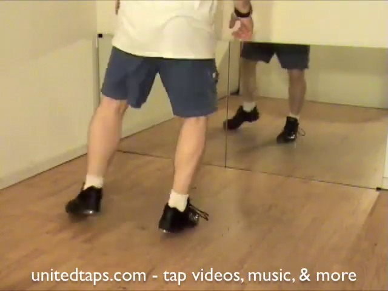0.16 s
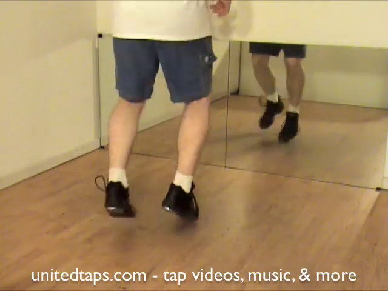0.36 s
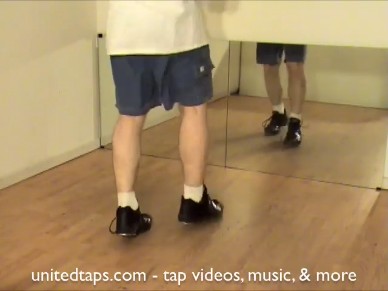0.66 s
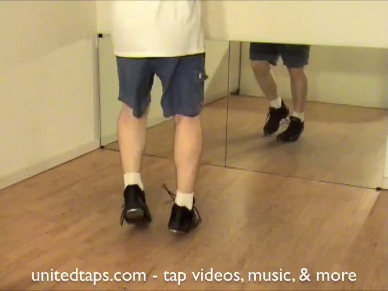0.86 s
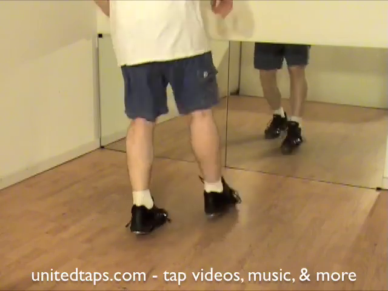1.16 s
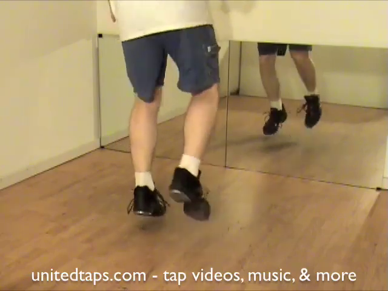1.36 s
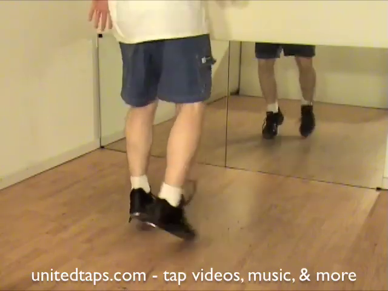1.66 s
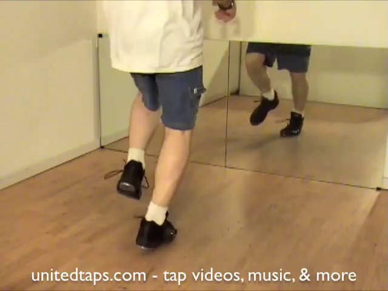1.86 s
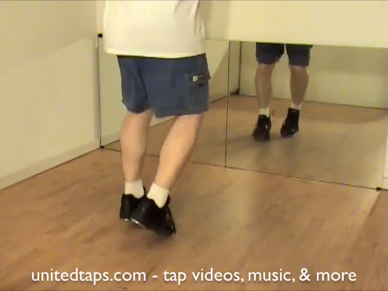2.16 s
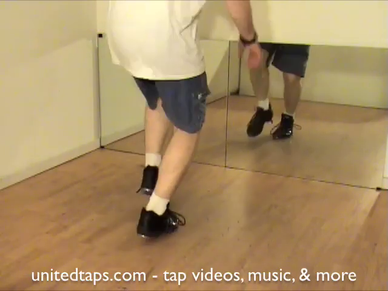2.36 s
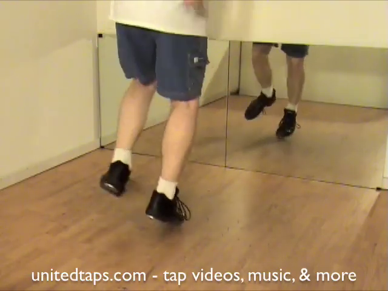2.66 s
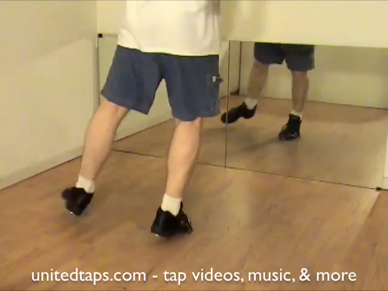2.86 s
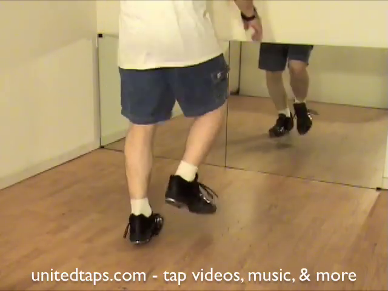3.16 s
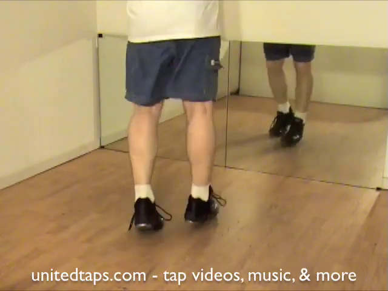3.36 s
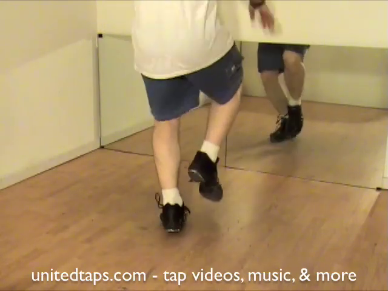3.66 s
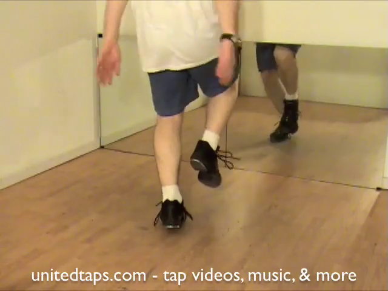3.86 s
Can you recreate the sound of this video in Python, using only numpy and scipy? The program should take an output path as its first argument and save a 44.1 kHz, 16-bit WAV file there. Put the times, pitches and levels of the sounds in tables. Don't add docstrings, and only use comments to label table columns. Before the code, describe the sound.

A solo tap dancer's metal-plated shoes click and knock on floorboards, starting in the ring of an earlier step, with some heavier low thumps; lively room echo, distant microphone, faint background hiss.

```python
import sys
import numpy as np
from scipy import signal
from scipy.fft import rfft, irfft
from scipy.io import wavfile

SR = 44100
rng = np.random.default_rng(int(sys.argv[2]) if len(sys.argv) > 2 else 0)


def natural_amplitude(level_db):
    exponent = np.asarray(level_db, float) / 20
    return 10 ** exponent


def log_audio(samples):
    frames = np.atleast_2d(samples).T
    limited = np.clip(frames, -1, 1)
    pcm = np.round(limited * 32767).astype(np.int16)
    wavfile.write(sys.argv[1], SR, pcm)


N = 176400

# [t/s, click level/dB, boards level/dB, plate level/dB, edge level/dB]
HEEL_DROPS = [(0.181, -3, -14, -23.5, -17), (0.3184, -4.5, -14, -27, -15), (0.437, -6.5, -14.5, -31, -15.5),
              (0.9808, -6, -17, -30, -16.5), (1.4143, -5.5, -17, -28.5, -16.5),
              (1.9652, -6, -16, -25.5, -19), (2.1036, 0, -16, -21, -11), (2.4274, -5, -17.5, -30, -16.5),
              (2.5705, -6, -17.5, -29.5, -16), (2.8359, -7.5, -14.5, -30, -18),
              (2.9529, -6.5, -20, -25.5, -20.5), (3.0699, -8.5, -16, -29.5, -17.5),
              (3.586, -2, -18, -27, -15)]
# [click f/Hz, boards f/Hz]
HEEL_PITCHES = [(4370, 665), (4240, 726), (3990, 600), (4270, 606), (4500, 580), (3950, 582), (4070, 642),
                (3870, 570), (3900, 584), (4170, 687), (4360, 713), (4160, 602), (4780, 640)]
# [t/s, click, boards, plate, edge level/dB]
LIGHT_TOUCHES = [
    (-.04, -2.5, -16.5, -30, -16.5),
    (.098, -8, -24, -51, -15),
    (0.784, -44, -21, -81, -21),
]
# [click f/Hz, boards f/Hz]
TOUCH_PITCHES = [(4000, 527), (4500, 720), (4500, 880)]
# [multiple of click f, length t/s, own level/dB, extra level into the room/dB]
HEEL_CLICK_MODES = [(0.819, 0.00069, -4, 0.5), (1.099, 0.0011, -1.5, -8.5)]
HEEL_EDGE_MODES = [(1.45, 0.00049, 5, 1.3), (1.9, 0.00025, 1, 3.5)]
# [first gap f/Hz, rebound level/dB]
HEEL_BOUNCE = (2263, -20.5)


def heel_drops(mix):
    plate_hz = 1500
    rows = list(HEEL_DROPS) + list(LIGHT_TOUCHES)
    pitches = list(HEEL_PITCHES) + list(TOUCH_PITCHES)
    for row, hz in zip(rows, pitches):
        sound = strike(row, (*hz, plate_hz), HEEL_CLICK_MODES, HEEL_EDGE_MODES, HEEL_BOUNCE)
        add(mix, row[0], sound)


# [t/s, click level/dB, boards level/dB, plate level/dB, edge level/dB]
TOE_TAPS = [(0.0833, 0, -26, -19, -21.5), (0.6464, -4.5, -26, -29.5, -11.5),
            (0.7864, -3, -42, -32.5, -17.5), (1.1184, -8.5, -25, -25, -21), (1.272, -3.5, -25.5, -25, -11),
            (1.527, -2.5, -20.5, -23, -12), (1.6574, 0, -30, -24, -10), (1.7708, 0, -21.5, -20, -13.5),
            (2.2799, 0, -32.5, -20.5, -14), (2.7282, -2, -25.5, -22, -17), (3.2622, -2.5, -32.5, -26, -18),
            (3.4068, -2.5, -21.5, -24, -12)]
# [click f/Hz, boards f/Hz, plate f/Hz]
TOE_PITCHES = [(4470, 580, 1710), (3980, 495, 1470), (4250, 560, 2130), (3960, 590, 1660),
               (3750, 550, 1620), (3750, 617, 1870), (3550, 540, 1580), (4230, 633, 1750),
               (3860, 390, 1710), (4570, 630, 1620), (4000, 540, 1450), (4570, 670, 1900)]
# [first gap f/Hz, rebound level/dB]
TOE_BOUNCES = [(2900, -10), (2600, -4), (2600, -4.5), (2500, -8), (2450, -6), (2650, -7), (2600, -7),
               (2700, -9), (2700, -8), (2900, -8), (2400, -9), (1350, -12)]
# [multiple of click f, length t/s, own level/dB, extra level into the room/dB]
TOE_CLICK_MODES = [(0.798, 0.00092, -8, -1), (1.032, 0.00091, -5, -4)]
TOE_EDGE_MODES = [(1.499, 0.00074, 1.5, 2), (1.95, 0.0003, -1, 3.8)]


def toe_taps(mix):
    for row, hz, rebound in zip(TOE_TAPS, TOE_PITCHES, TOE_BOUNCES):
        add(mix, row[0], strike(row, hz, TOE_CLICK_MODES, TOE_EDGE_MODES, rebound))


# [multiple of boards f, length t/s, own level/dB, extra level into the room/dB]
BOARD_MODES = [(.88, 0.0059, 0.28, 6.9), (1.399, 0.00361, -0.64, 6.4)]
PLATE_MODES = [(.86, 0.00357, 3.35, 2.24), (1.14, 0.0018, 6.5, 4.9)]


def strike(row, pitches, click, edge, rebound):
    pitch_spread = 0.025
    direct_ring, direct_db = 1.305, 4
    gap_hz, rebound_db = rebound
    hz_axis = np.fft.rfftfreq(1024, 1 / SR)
    comb = 1 - natural_amplitude(rebound_db) * np.exp(-2j * np.pi * hz_axis / gap_hz)
    direct, into_room = np.zeros(1024), np.zeros(1024)
    groups = (click, BOARD_MODES, PLATE_MODES, edge)
    for db, modes, unit in zip(row[1:], groups, (*pitches, pitches[0])):
        gaps = 1 if modes is BOARD_MODES else comb
        for pitch, length, own_db, room_db in modes:
            hz = pitch * unit * (1 + pitch_spread * rng.standard_normal())
            head_on = natural_amplitude(DIRECT := direct_db) * burst(hz, direct_ring * length, 2 * np.pi * rng.random())
            spread = natural_amplitude(room_db) * burst(hz, length)
            head_on, spread = natural_amplitude(db + own_db) * irfft(rfft([head_on, spread]) * gaps)
            direct = direct + head_on
            into_room = into_room + spread
    out = signal.fftconvolve(direct, reflections()) + signal.fftconvolve(into_room, room_tail())
    add(out, 0, direct)
    return out


def burst(hz, length, phase=0):
    peak_s = 0.0011
    t = np.arange(1024) / SR - max(peak_s, length / 3)
    u = np.maximum(t / length * 6 + 2, 0)
    envelope = (u / 2) ** 2 * np.exp(2 - u)
    return -envelope * np.cos(2 * np.pi * hz * t + phase)


# [t/s, level/dB]
JOIST_LANDINGS = [(0.32, -31.5), (0.648, -25), (0.79, -32), (0.983, -37), (1.274, -29), (1.528, -29),
                  (1.655, -25), (2.103, -21.5), (2.431, -34), (2.573, -39), (2.835, -41), (3.409, -26),
                  (3.585, -20)]


def landings(mix):
    joist_hz, length_s = 130, 0.0056
    for s, db in JOIST_LANDINGS:
        add(mix, s, natural_amplitude(db + 8.5) * burst(joist_hz, length_s, np.pi / 2))


# [delay t/s, level/dB]
REFLECTIONS = [(.004, -2.5), (.0074, -7), (.0105, -12), (.0140, -11), (.018, -14)]


def reflections():
    shift_s, shift_db = 0.0003, 1.5
    walls = np.zeros(SR)
    for delay, db in REFLECTIONS:
        shift, size = rng.standard_normal(2)
        walls[round((delay + shift_s * shift) * SR)] = natural_amplitude(db + shift_db * size)
    return walls


# [f/Hz, t60/s]
DECAY_TIMES = [(120, .3), (330, .72), (870, .72), (2300, .62), (4500, .64), (7000, .56), (10000, .4)]
# [f/Hz, t/s]
BUILD_UP = [(300, 0.0047), (1500, 0.0046), (5000, 0.0013)]
# [f/Hz, t60/s, level/dB]
STANDING_WAVES = [(331.8, 0.69, -35), (441.6, 0.85, -38), (511.6, 0.3, -41.5)]


def room_tail():
    level_db = 7.5
    taps = np.zeros(SR)
    taps[np.arange(0, SR - 10, 10) + rng.integers(0, 10, (SR - 1) // 10)] = 1
    taps = taps * rng.choice([-1., 1.], SR)
    hz, t, z = signal.stft(taps, SR, nperseg=128, noverlap=96)
    decay = natural_amplitude(-60 * t / read(DECAY_TIMES, hz)[:, None])
    rise = 1 - np.exp(-t / read(BUILD_UP, hz)[:, None])
    out = signal.istft(z * decay * rise, SR, nperseg=128, noverlap=96)[1][:SR]
    t = np.arange(SR) / SR
    for f, t60, db in STANDING_WAVES:
        out = out + natural_amplitude(db - 60 * t / t60) * np.sin(2 * np.pi * f * t) * rng.choice([-1., 1.])
    return natural_amplitude(level_db) * out / np.linalg.norm(out)


# [f/Hz, level/dB]
HUSH_SPECTRUM = [(20, 0), (60, -3), (150, -9), (300, -20), (1000, -20), (4000, -27), (8000, -44),
                 (10500, -70)]


def hush():
    level_db = -64
    shape = natural_amplitude(read(HUSH_SPECTRUM, np.fft.rfftfreq(N, 1 / SR)))
    x = irfft(rfft(rng.standard_normal(N)) * shape, N)
    return natural_amplitude(level_db) * x / x.std()


def hum():
    hum_hz, level_db = 229, -68
    return natural_amplitude(level_db) * np.sin(2 * np.pi * hum_hz * np.arange(N) / SR)


def read(points, hz):
    f, value = np.transpose(points)
    return np.interp(np.log(hz + 1), np.log(f + 1), value)


def add(mix, s, sound):
    at = round(s * SR)
    sound = sound[max(-at, 0):]
    part = mix[max(at, 0):][:len(sound)]
    part += sound[:len(part)]


def scene():
    mix = np.zeros(N)
    heel_drops(mix)
    toe_taps(mix)
    landings(mix)
    return mix[None]


# [f/Hz, level/dB]
MIC_RESPONSE = [(150, -13.5), (280, -6.5), (2000, -6), (2500, -3), (3200, -6), (8500, -4.5), (10500, -13.5),
                (12200, -32)]


def microphone(dry):
    ceiling, edge_hz = 2.2, 12250
    hz = np.fft.rfftfreq(2 * N, 1 / SR)
    response = natural_amplitude(read(MIC_RESPONSE, hz)) * (hz < edge_hz)
    soft = ceiling * np.tanh(dry / ceiling)
    return irfft(rfft(soft, 2 * N) * response)[:, :N]


def top_gate(x):
    top_hz, jump = 10950, 2.5
    hz, t, z = signal.stft(x, SR, nperseg=512)
    power = (abs(z[:, hz > 3000]) ** 2).mean(1, keepdims=True)
    jumps = power > jump * np.roll(power, 3, axis=2)
    z = z * np.where((hz > top_hz)[:, None], jumps, 1)
    return signal.istft(z, SR, nperseg=512)[1][:, :N]


def roll_off(x):
    return signal.sosfilt(signal.butter(12, 12330, fs=SR, output="sos"), x)


def record(dry):
    x = microphone(dry) + hush() + hum()
    mix = np.clip(top_gate(x), -.88, .88)
    return roll_off(mix)


dry = scene()
out = record(dry)
log_audio(out)
```